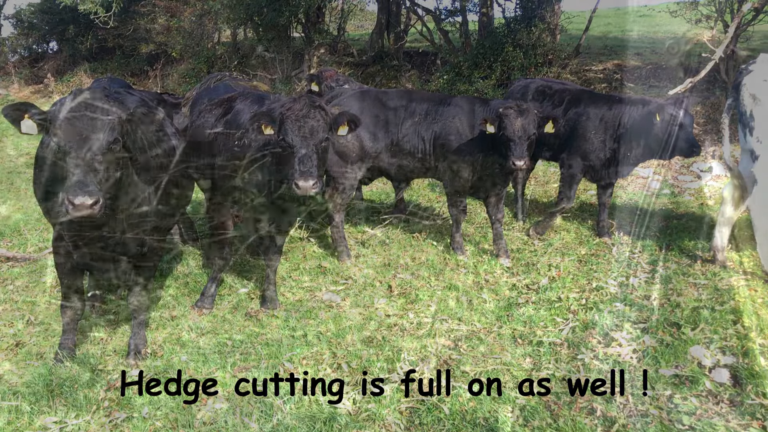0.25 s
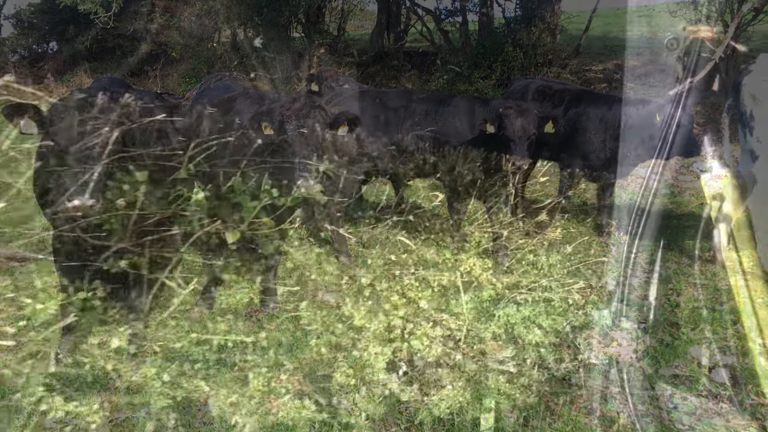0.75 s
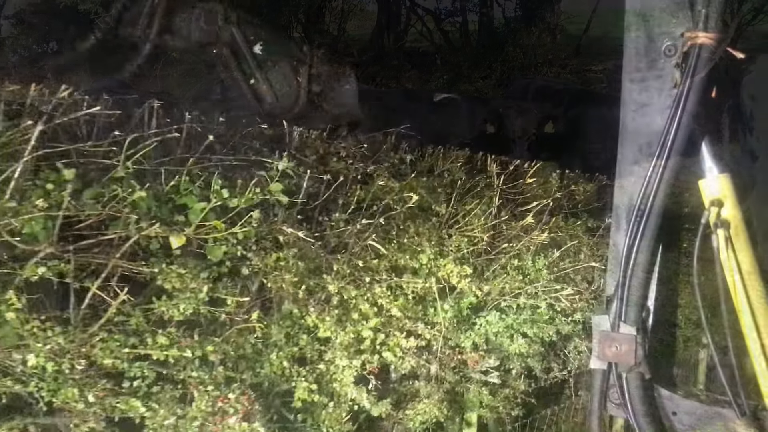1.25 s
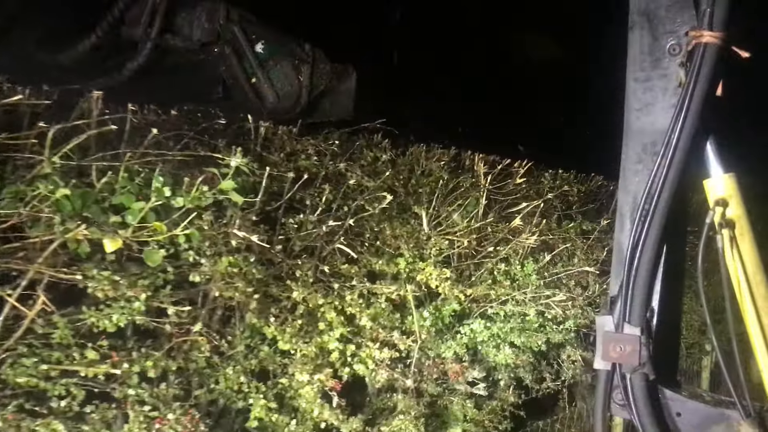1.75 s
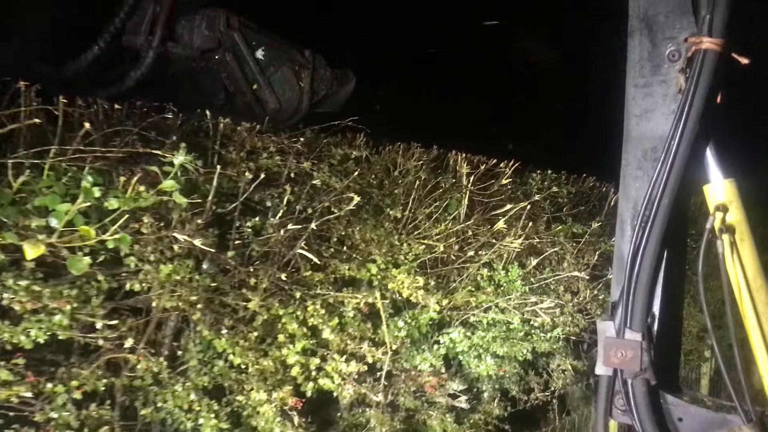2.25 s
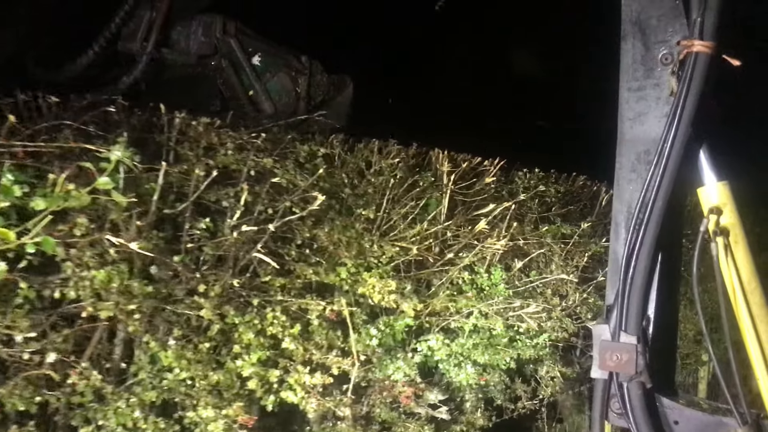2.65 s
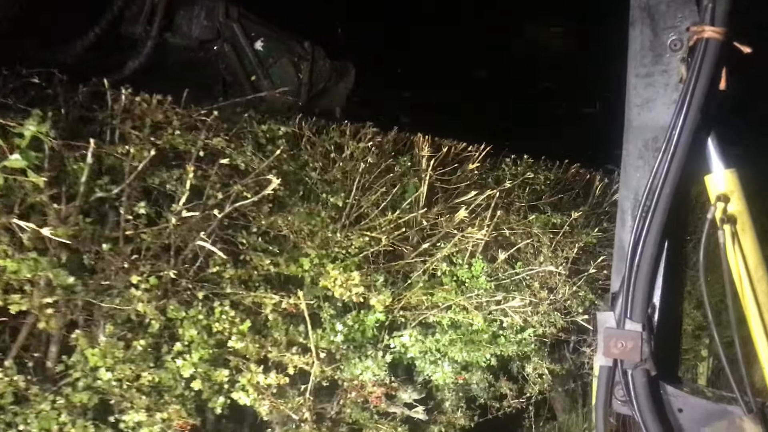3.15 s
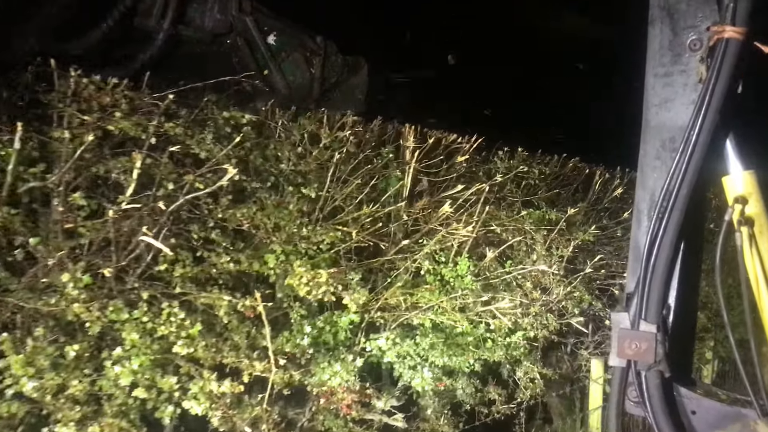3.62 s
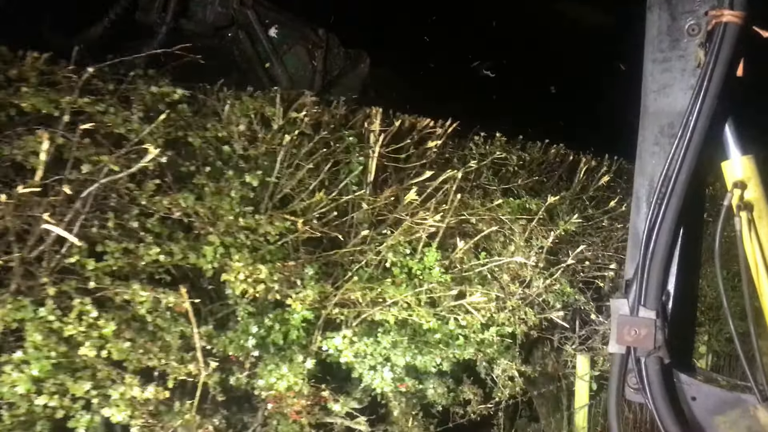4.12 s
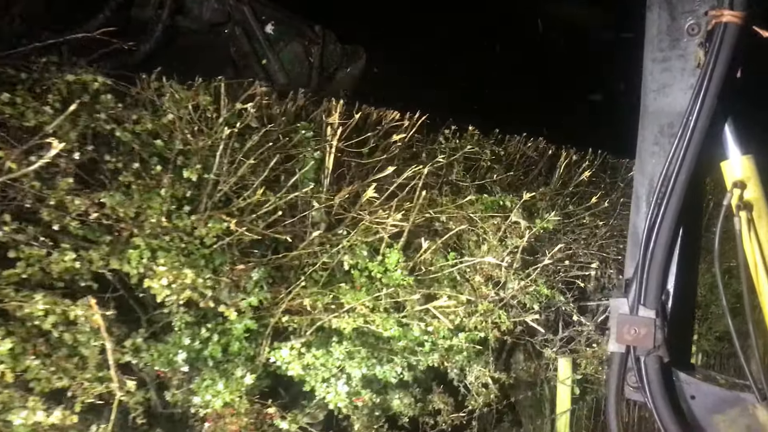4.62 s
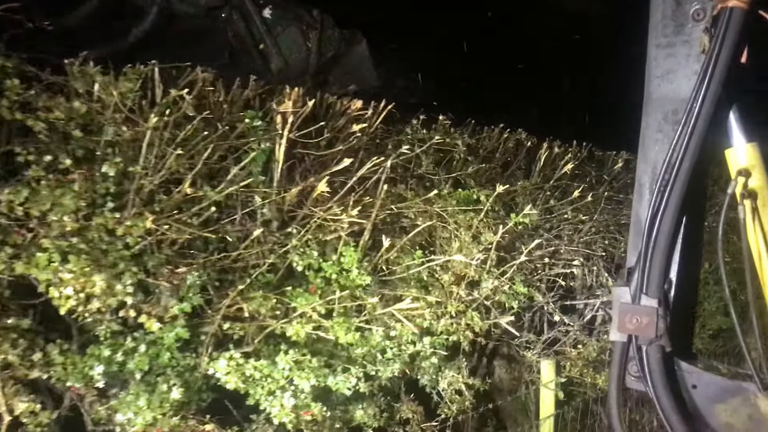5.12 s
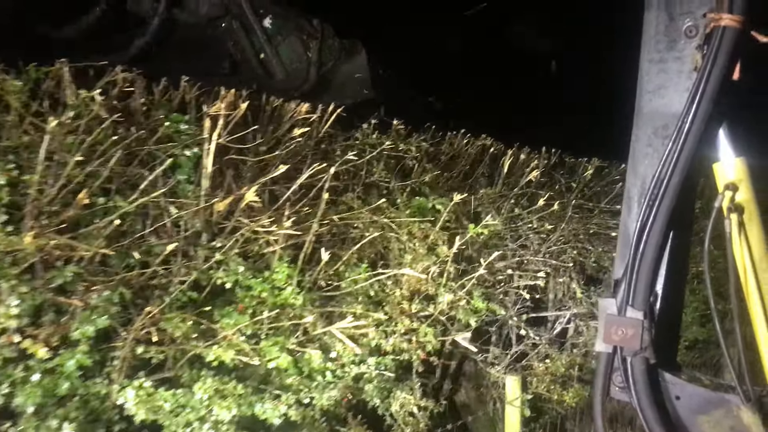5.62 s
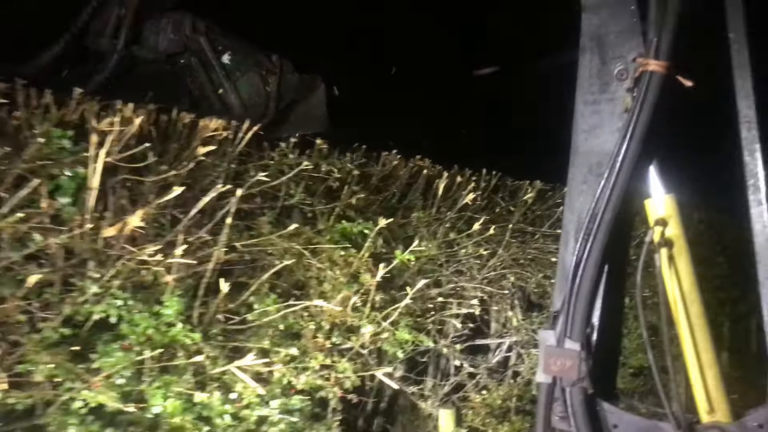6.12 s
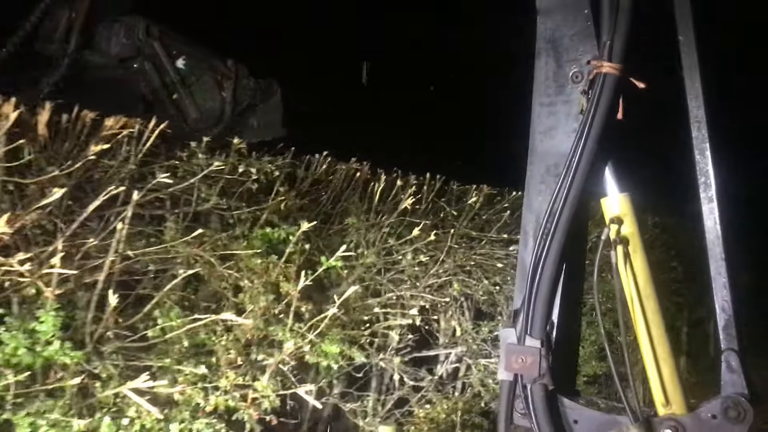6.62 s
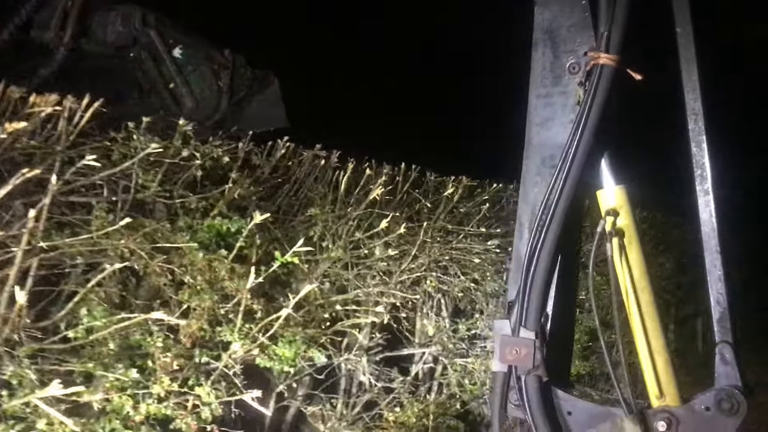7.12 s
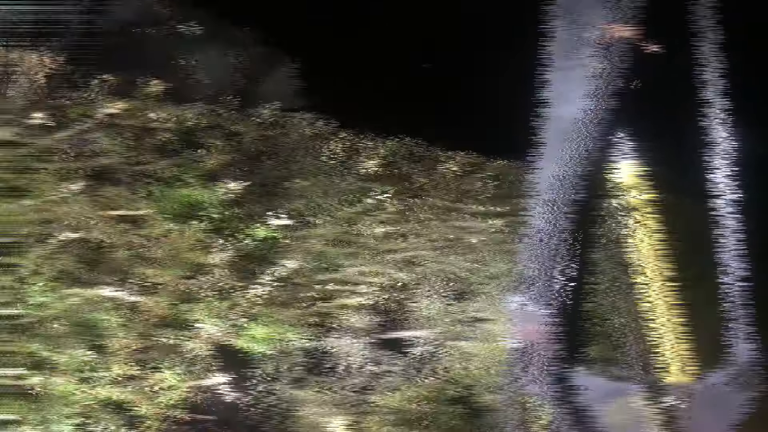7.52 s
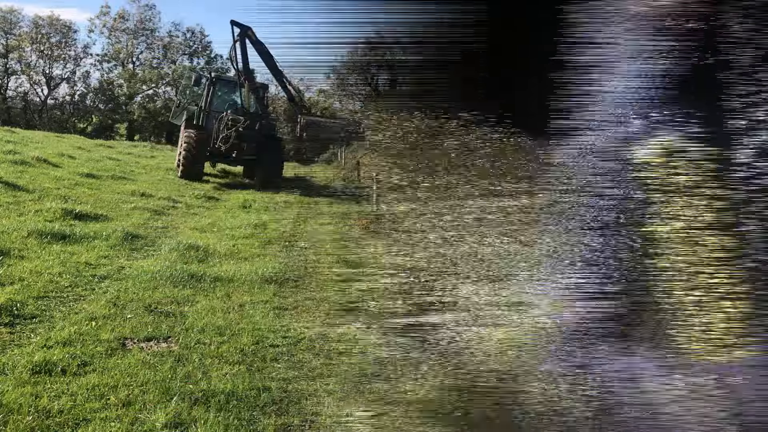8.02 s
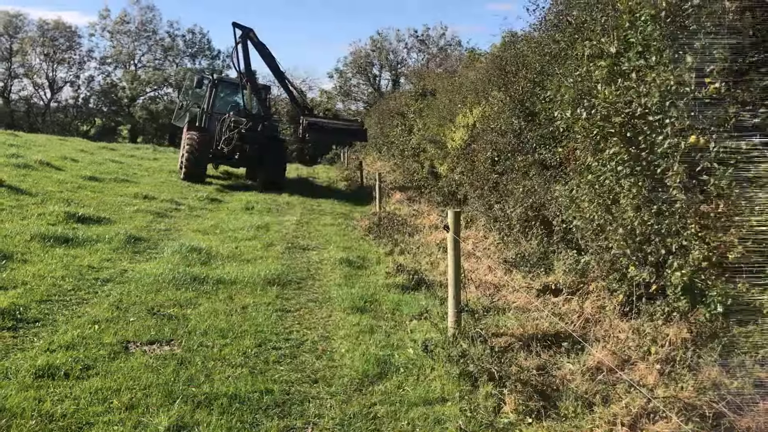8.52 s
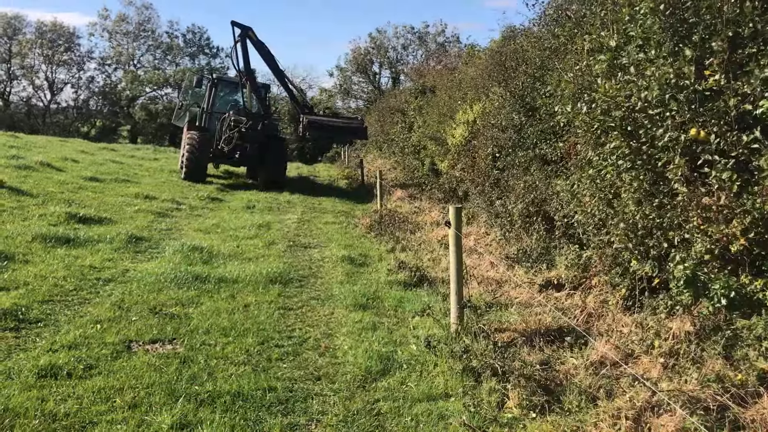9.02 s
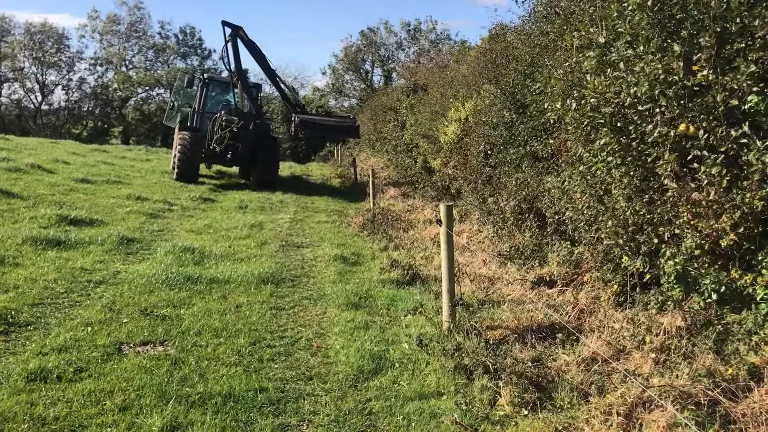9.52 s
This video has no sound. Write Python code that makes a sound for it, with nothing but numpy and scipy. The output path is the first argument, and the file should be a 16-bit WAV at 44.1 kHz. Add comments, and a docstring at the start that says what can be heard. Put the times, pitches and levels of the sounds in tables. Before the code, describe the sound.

A tractor trimming a hedge fades in, heard close beside the cab at a field edge. Its diesel throbs and whines and the cutter's rotor hums, while flails crunch through wood, crack twigs, snap thick stems and spray leaves and chips. The near machine then fades out with a faint thin squeal and a soft swish of leaves, leaving a much quieter tractor knocking far across the open field.

```python
"""A field edge, beside the cab of a tractor trimming a hedge with a flail head. The diesel throbs and
whines and the rotor hums; the flails chop through wood and throw a spray of chips, thick stems snap
and single twigs burst with a crack. This near sound fades in, then out with a thin squeal and a swish
of leaves, giving way to the knocking diesel of a tractor far across the field."""
import sys
import numpy as np
from scipy import signal
from scipy.fft import rfft, irfft, next_fast_len
from scipy.io import wavfile
from scipy.ndimage import uniform_filter1d, map_coordinates

SR = 44100
rng = np.random.default_rng(int(sys.argv[2]) if len(sys.argv) > 2 else 0)


def dump(signal):
    """Clip the signal to [-1, 1] and save it as 16-bit WAV at the path in sys.argv[1]."""
    limited = np.clip(np.atleast_2d(signal).T, -1, 1)
    pcm = np.round(limited * 32767).astype(np.int16)
    wavfile.write(sys.argv[1], SR, pcm)


N = 430416

# Table levels are relative: layer trims and the near fade ride on top of them.
# open air over the field: (frequency [Hz], level [dB])
AIR_SPECTRUM = [(20, -6), (300, 13), (1500, 8), (3000, -4), (5000, -8.5), (8000, -9), (11000, -13),
                (15000, -34)]
# fade-in of the far tractor and the air: (time [s], level [dB])
FAR_FADE = [(7.4, -85), (7.8, -64), (8.2, -48.5), (8.55, -46), (8.8, -44.5), (9.15, -43.5), (9.76, -43.5)]
# tone of one far exhaust beat: (frequency [Hz], level [dB])
FAR_EXHAUST_SPECTRUM = [(15, -24), (32, -1), (64, 2), (96, 1), (128, -5.5), (165, -5), (260, -23),
                        (450, -20), (560, -27.5), (1000, -34), (2500, -39), (8000, -75)]
# far engine clatter: (frequency [Hz], level [dB])
FAR_CLATTER_SPECTRUM = [(300, -40), (650, 5.5), (900, -13), (1100, 1), (1600, 0), (2400, -5.5),
                        (3100, -16.5), (5000, -25), (8000, -23), (15000, -60)]
# far rumble and echo: (frequency [Hz], level [dB])
FAR_RUMBLE_SPECTRUM = [(20, -25), (60, -8), (130, -3), (230, 3), (340, 1), (470, 1.5), (570, -12.5),
                       (1000, -12.5), (4000, -53)]
# ring of the far engine block: (frequency [Hz], width [Hz], gain [dB])
BLOCK_RESONANCES = [(1070, 90, 5), (1570, 220, 3.5), (2140, 150, 1), (3660, 240, 7), (4960, 450, 11)]
# hardest knocks of the far diesel: (time [s], level [dB])
HARD_KNOCKS = [(8.747, -37), (8.873, -41), (8.937, -44), (8.999, -43), (9.063, -44), (9.094, -39),
               (9.348, -41), (9.501, -43), (9.531, -42), (9.567, -45), (9.598, -45)]
# what each knock rings: (frequency [Hz], level [dB], t60 [s])
KNOCK_MODES = [(1080, -10, 0.022), (1290, -14, .012), (1560, -1, 0.028), (1750, -4, .014),
               (2220, -12, .016), (2570, -19, .016)]

# fader ride on the near tractor and its cutting: (time [s], level [dB])
NEAR_FADE = [(0.62, -37), (0.7, -26.5), (0.83, -20), (1.02, -15.5), (1.35, -9.5), (1.9, -4), (2.3, -3),
             (2.85, -.5), (4.3, 0.3), (5.85, 0.2), (6.25, -2), (6.75, -2.5), (7.5, -8), (8.0, -15),
             (8.3, -19.5), (8.7, -31)]
# four-cylinder diesel, sagging in thick growth: (time [s], firing rate [Hz])
FIRING_RATE = [(0.62, 42.8), (1.15, 42.6), (1.6, 42.85), (1.9, 42.1), (2.1, 42.3), (2.35, 41.95),
               (2.6, 43.2), (2.85, 43.0), (3.5, 42.2), (4.2, 42.25), (4.7, 41.9), (4.95, 42.2),
               (5.25, 41.8), (5.8, 42.0), (6.5, 42.95), (6.9, 42.6), (8.0, 42.85)]
# thickness of the growth in the flails: (time [s], load [0-1])
GROWTH_LOAD = [(2.4, 0), (2.9, 0.85), (5.4, 0.7), (6.0, 0.1)]
# exhaust throb: (time [s], level [dB])
EXHAUST_LEVEL = [(0.8, -37), (1.02, -29), (1.3, -28), (1.75, -37.5), (2.15, -30.5), (2.55, -25),
                 (2.95, -40), (3.25, -28), (3.6, -30.5), (4.2, -30.5), (4.7, -27.5), (5.45, -31),
                 (5.75, -28), (6.3, -27), (6.68, -37.5), (7.1, -27), (8.4, -31.5)]
# diesel tones, in quarter steps for four cylinders: (order [x firing rate], level [dB])
DIESEL_ORDERS = [(1.25, -18), (2, -5), (2.25, -17), (2.75, -18.5), (3, -4.5), (3.25, -10.5), (3.5, -16),
                 (4, -12.5), (4.25, -11), (4.5, -17), (4.75, -20.5), (5, -21), (6.75, -19), (10, -11.5),
                 (10.25, -20.5), (10.5, -15), (11, -12), (12, -14.5), (13, -15.5), (13.5, -28), (14, -18.5),
                 (15, -25), (17.25, -19.5), (17.5, -14.5), (24, -20), (27.75, -21), (28, -21.5),
                 (34.75, -24)]
# hum of the flail rotor: (order [x rotor speed], level [dB])
ROTOR_ORDERS = [(4, -6), (8, -11.5)]
# roar of the machine: (frequency [Hz], level [dB])
ROAR_SPECTRUM = [(20, -35), (35, 1), (65, 1), (100, -7.5), (160, -1.5), (240, -0.5), (360, -7), (620, -8),
                 (900, -9.5), (1400, -12), (1800, -17), (3200, -26), (5000, -31.5), (15000, -41)]
# pulsing of the roar: (order [x firing rate], depth [dB])
ROAR_PULSES = [(0.25, 0.6), (1, 0.5), (1.5, 0.6), (2, 1.0), (3, 0.9)]
# steel hood over the rotor: (frequency [Hz], width [Hz], gain [dB])
HOOD_RESONANCES = [(463, 24, 1), (1033, 48, 4.5), (1186, 185, 6.5), (1464, 60, 3), (2030, 150, 3.5),
                   (2238, 110, 7), (2930, 290, 6), (4120, 250, 4.5)]
# a loose panel singing in the roar: (frequency [Hz], width [Hz], gain [dB])
PANEL_RESONANCE = [(743.5, 18, 6)]
# ride on the low boom: (time [s], level [dB])
BOOM_LEVEL = [(1.0, -1.5), (3.0, -0.5), (4.8, 0), (5.8, 1.3), (6.8, 1.8), (8.0, 0.3)]

# thick stems snapping: (time [s], level [dB], lowest mode [Hz])
STEM_SNAPS = [(1.439, -29, 1140), (2.811, -31, 1390), (2.849, -19.5, 1090), (2.872, -23, 1110),
              (2.924, -24, 970), (2.95, -24, 1020), (3.467, -19, 1280), (3.492, -18, 1010),
              (3.847, -22, 1260), (3.866, -28, 1000), (4.785, -22, 1140), (4.838, -23, 1070),
              (4.869, -29, 1250), (4.922, -27, 1500), (5.872, -28.5, 1080), (6.472, -20.5, 980)]
# ring of a stem: (ratio [x lowest mode], level [dB], t60 [s])
STEM_MODES = [(1, 3.5, 0.011), (1.5, -5.5, 0.0063), (2.1, -3, 0.0067), (2.8, 2.5, 0.0036), (3.7, 1, 0.005)]
# the loudest twigs bursting: (time [s], level [dB], woody body gain [dB], body pitch [Hz])
TWIG_BURSTS = [(1.092, -24, -12, 3300), (1.1917, -24, -9, 2930), (1.286, -24.5, -5, 3210),
               (1.324, -22.5, -14, 3720), (1.429, -24.5, -13, 2870), (1.474, -32, -15, 5200),
               (1.646, -31, -7, 4300), (1.725, -29, -9, 8900), (1.85, -29.5, -20, 5000),
               (2.018, -28, -12, 5000), (2.384, -20, -10, 3040), (2.478, -24, -3, 3000),
               (2.714, -27.5, 3, 3170), (2.738, -33, 4, 2200), (2.9462, -22, 0, 4040),
               (3.24, -18, -7, 2980), (3.3794, -19, -15, 6300), (3.4461, -17, -18, 2790),
               (3.688, -23, -15, 3500), (3.772, -30, 3, 3130), (3.802, -33, 3, 3920),
               (3.8496, -23, 3, 2970), (3.893, -22, -5, 3500), (4.0956, -34, 6, 3090),
               (4.18, -23.5, -6, 3400), (4.423, -25, -11, 3100), (4.5744, -29, 1.5, 2250),
               (4.842, -29, 6, 2200), (5.053, -30, -10, 5500), (5.1053, -28, -2, 3900),
               (5.277, -28, -4.5, 4380), (5.362, -37, 4, 3600), (5.5099, -23.5, -20, 4090),
               (5.5817, -30, -17, 2870), (5.7544, -35, -17, 2500), (5.8641, -31.5, -11, 2940),
               (5.926, -28, -8, 2950), (5.984, -34, -8, 3400), (6.131, -30, -6, 2610),
               (6.225, -29.5, -6, 3630), (6.308, -24, -4.5, 3640), (6.344, -35, 2, 4600),
               (6.39, -30.5, 1, 4380), (6.464, -26, -12, 3900), (6.578, -29, -9, 5800),
               (6.653, -27, -15, 2680), (6.758, -33, -14, 3400), (6.832, -38, -13, 3800),
               (6.972, -32, -8, 2970), (7.039, -26, -8, 2540), (7.1082, -26, -11, 4170),
               (7.2144, -24, -15, 5950), (7.3721, -34, 5, 4330), (7.3944, -32, 0, 3640),
               (7.4305, -27.5, -0.5, 4360), (7.499, -32, -6, 2300), (7.5637, -30, -11, 6610),
               (7.6011, -24, -20, 2790), (7.672, -26.5, -5, 2780), (8.0441, -30, -11, 2500)]
# a twig's bright splinters: (frequency [Hz], level [dB])
SPLINTER_SPECTRUM = [(300, -22), (1500, 7), (3000, -3.5), (6000, 2), (9000, 1.5), (12000, -2),
                     (15500, -3.5)]
# a twig's woody body: (frequency [Hz], level [dB])
TWIG_BODY_SPECTRUM = [(200, -12), (900, 5), (2200, -7), (6500, -7.5), (14000, -20)]
# steady spray of leaves and chips: (time [s], level [dB])
SPRAY_LEVEL = [(0.8, -37.5), (1.1, -40), (1.7, -49), (2.03, -43.5), (2.34, -48.5), (2.4, -40.5),
               (2.75, -39), (3.1, -38.5), (3.65, -34.5), (4.1, -38.5), (5.03, -39), (5.2, -51.5),
               (5.55, -40), (5.74, -45.5), (5.83, -52.5), (6.45, -49), (6.95, -46.5), (7.3, -46),
               (7.74, -45), (7.88, -56)]
# branches drawn into the flails: (time [s], length [s], chop level [dB], spray level [dB])
BRANCH_FEEDS = [(2.392, 0.11, -40, -41), (2.794, 0.14, -28, -37.5), (2.864, 0.08, -38, -37),
                (3.012, 0.077, -34, -36.5), (3.246, 0.18, -33, -36.5), (3.413, 0.14, -32, -30.5),
                (3.763, 0.2, -41, -38), (4.41, 0.27, -33.5, -40), (4.661, 0.25, -32, -35.5),
                (4.813, 0.048, -33, -48), (5.5, 0.023, -51, -56), (5.61, 0.027, -46, -48),
                (5.86, 0.027, -39, -56), (7.159, 0.086, -40, -35), (7.305, 0.13, -47, -42)]
# flails in wood: (frequency [Hz], level [dB])
CHOP_SPECTRUM = [(40, -4), (90, 22.5), (200, 9.5), (400, 4.5), (800, 7), (1500, -1), (2100, 4.5),
                 (3300, -1.5), (5000, -1.5), (8000, -11), (15000, -23)]
# flying chips: (frequency [Hz], level [dB])
CHIP_SPECTRUM = [(300, -21), (1500, -1.5), (3000, 0.5), (6000, 1), (9000, -1), (12000, -3.5), (15500, -3)]
# treble notches of the microphone port: (frequency [Hz], width [Hz], gain [dB])
PORT_NOTCHES = [(4950, 280, -4.5), (7690, 680, -4), (10500, 400, -5)]

FAR_CRANK_HZ, FAR_BEAT_S = 31.88, 9.004  # far crank speed, and the time of one exhaust beat
ROTOR_LAG_HZ, TROUGH_S = 2.2, 2.99  # the rotor runs this far under the firing rate; a trough of the beat
TOP_HZ = 15790


def amp(db):
    """Decibels to gain."""
    return 10 ** (np.asarray(db) / 20)


def unit(x):
    """Scale to rms 1."""
    return x / np.sqrt(np.mean(x ** 2) + 1e-20)


def clock():
    """Time of each sample."""
    return np.arange(N) / SR


def curve(points):
    """An automation lane: (time, value) points drawn out to every sample."""
    return np.interp(clock(), *np.transpose(points))


def along(points, hz):
    """Read an EQ curve in dB on a log frequency axis."""
    frequencies, levels = np.transpose(points)
    return np.interp(np.log(hz + 1), np.log(frequencies + 1), levels)


def bumps(modes, hz):
    """Gain in dB of a set of resonances or notches."""
    return sum(db / (1 + (2 * (hz - centre) / width) ** 2) for centre, width, db in modes)


def wobble(rate):
    """A smooth random curve, rate knots a second."""
    return map_coordinates(rng.standard_normal(int(N * rate / SR) + 4), [clock() * rate], order=2)


def filtered(x, response):
    """Zero-phase EQ: response gives the gain at each frequency."""
    size = next_fast_len(N + SR // 4)
    return irfft(rfft(x, size) * response(np.fft.rfftfreq(size, 1 / SR)), size)[:N]


def coloured(x, spectrum, modes=()):
    """x through a spectrum and its resonances, at rms 1."""
    return unit(filtered(x, lambda hz: amp(along(spectrum, hz) + bumps(modes, hz))))


def impulse_response(spectrum, size=4096):
    """Minimum-phase pulse with a given spectrum."""
    cepstrum = irfft(np.log(amp(along(spectrum, np.fft.rfftfreq(size, 1 / SR)))))
    cepstrum[1:size // 2] *= 2
    cepstrum[size // 2 + 1:] = 0
    return irfft(np.exp(rfft(cepstrum)))


def ticks(rate, scatter_db):
    """Random impacts of uneven size, rate a second."""
    return (rng.random(N) < rate / SR) * amp(scatter_db * np.clip(rng.standard_normal(N), -2, 2))


def crackle(rate, hiss):
    """Dense tiny fractures over a fine hiss."""
    clicks = unit(ticks(rate, scatter_db=4) * rng.choice([-1, 1], N))
    return unit(clicks + hiss * rng.standard_normal(N))


def bursts(blows, t60):
    """Envelope of rms 1: every blow starts a burst that dies away."""
    t = np.arange(SR // 4) / SR
    power = signal.fftconvolve(blows ** 2, amp(-60 * t / t60) ** 2)[:N]
    return unit(np.sqrt(np.abs(power)))


def struck(modes, scale, t, t60):
    """A quick, dying run of small blows rings a set of modes, balanced a little differently each time."""
    blows = rng.standard_normal(len(t)) * (rng.random(len(t)) < 3000 / SR)
    ring = sum(amp(db + 2 * rng.standard_normal() - 60 * t / mode_t60)
               * np.sin(2 * np.pi * (scale * mode * t + rng.random())) for mode, db, mode_t60 in modes)
    attack = 1 - np.exp(-t / .002)
    return attack * amp(-60 * t / t60) * unit(signal.fftconvolve(blows, ring)[:len(t)])


def open_air():
    """A faint bed of hiss, tinted by the far engine's block and rising with it."""
    return amp(curve(FAR_FADE) - 15.5) * coloured(rng.standard_normal(N), AIR_SPECTRUM, BLOCK_RESONANCES)


def far_tractor():
    """One exhaust beat stands out in each crank turn, led by a clatter that rings the block."""
    turns = np.floor((clock() - FAR_BEAT_S) * FAR_CRANK_HZ)
    beats = np.diff(turns, prepend=turns[0]) * amp(0.71 * rng.standard_normal(N))
    t = np.arange(SR // 16) / SR
    scatter = rng.standard_normal(len(t)) * amp(-60 * t / 0.14)  # off the body, ground and hedge
    direct = unit(signal.fftconvolve(-beats, impulse_response(FAR_EXHAUST_SPECTRUM))[:N])
    echo = coloured(signal.fftconvolve(beats, scatter)[:N], FAR_RUMBLE_SPECTRUM)
    knocks = np.roll(beats, -SR // 180) * amp(0.6 * rng.standard_normal(N))
    knocking = .24 + uniform_filter1d(bursts(knocks, t60=.15), SR // 140)
    clatter = coloured(knocking * rng.standard_normal(N), FAR_CLATTER_SPECTRUM, BLOCK_RESONANCES)
    rumble = coloured(np.sqrt(knocking + 1e-6) * rng.standard_normal(N), FAR_RUMBLE_SPECTRUM)
    mix = amp(-5) * direct + amp(-6) * echo + amp(-8.5) * clatter + amp(-4) * rumble
    return amp(curve(FAR_FADE)) * mix


def far_knocks(smear_t60=0.063, cutoff_hz=4500):
    """Diesel knocks just ahead of each exhaust beat, smeared by ground and hedge, dulled by distance."""
    t = np.arange(SR // 16) / SR
    times = FAR_BEAT_S + np.arange(-40, 24) / FAR_CRANK_HZ - .005
    fade_db = np.interp(times, *np.transpose(FAR_FADE)) - FAR_FADE[-1][1]
    ordinary = zip(times, -55 + fade_db - rng.standard_normal(len(times)))
    out = np.zeros(N + len(t))
    for s, db in [*ordinary, *HARD_KNOCKS]:
        out[round(s * SR):][:len(t)] += amp(db - 3) * struck(KNOCK_MODES, 1, t, smear_t60)
    return filtered(out[:N], lambda hz: 1 / (1 + (hz / cutoff_hz) ** 4))


def rustle(centre_s=8.615, half_length_s=0.095):
    """A brief soft swish of leaves."""
    swell = np.exp(-((clock() - centre_s) / half_length_s) ** 4 / 2)
    return amp(-61) * swell * coloured(rng.standard_normal(N), CHIP_SPECTRUM)


def squeal(hz=10150):
    """A thin, faint squeal as the near machine fades."""
    swell = curve([(8.09, 0), (8.14, 1), (8.22, .8), (8.26, .25), (8.45, 0)])
    return amp(-75) * swell * np.sin(2 * np.pi * hz * clock() + 1.6 * wobble(160))


def cab_echoes(x, wet_db, count=40):
    """Boom arm, cab and bonnet throw back weak copies within 20 ms, which comb the treble."""
    lags = rng.integers(SR // 400, SR // 50, count)
    copies = sum(np.pad(x, (lag, 0))[:N] for lag in lags) / np.sqrt(count)
    treble = filtered(copies, lambda hz: hz ** 2 / (hz ** 2 + 1500 ** 2))
    return x + amp(wet_db) * treble


def debris_drift(x, depth_db):
    """Debris strikes ever different spots, so the mids and highs drift in colour."""
    hz, _, frames = signal.stft(x, SR, nperseg=512)
    patches = uniform_filter1d(rng.standard_normal(frames.shape), size=4, axis=0)
    patches = unit(uniform_filter1d(patches, size=9, axis=1))
    depth = depth_db * np.interp(hz, [600, 1400, 5000, 9000], [0, 1, 1, .5])
    return unit(signal.istft(frames * amp(depth[:, None] * patches), SR, nperseg=512)[1][:N])


def exhaust(firings, rotor_turns, shake_share=0.28):
    """The exhaust throbs once a firing; in thick growth it beats against the shake of the rotor."""
    shake = shake_share * curve(GROWTH_LOAD) * np.sin(2 * np.pi * rotor_turns)
    return amp(curve(EXHAUST_LEVEL)) * np.sqrt(2) * (np.sin(2 * np.pi * firings) - shake)


def shaft_tones(turns, orders, waver_db, slip):
    """Partials locked to a turning shaft; each wavers in level, and the high ones most in phase."""
    out = np.zeros(N)
    for order, db in orders:
        gain = amp(db + waver_db * wobble(9)) * np.sqrt(2)
        phase = 2 * np.pi * (order * turns + rng.random())
        out += gain * np.sin(phase + slip * np.sqrt(order) * wobble(14))
    return out


def machine(firings, rotor_turns, crossover_hz=240):
    """Diesel whine, rotor hum, and the pulsing roar of both in the hood."""
    diesel = shaft_tones(firings, DIESEL_ORDERS, waver_db=1.5, slip=.12)
    hum = shaft_tones(rotor_turns, ROTOR_ORDERS, waver_db=1.1, slip=.08)
    damping = amp(-1.5 * curve(GROWTH_LOAD))  # thick growth damps the hum
    throb = amp(sum(db * np.sin(2 * np.pi * order * firings) for order, db in ROAR_PULSES))
    roar = coloured(throb * rng.standard_normal(N), ROAR_SPECTRUM, [*HOOD_RESONANCES, *PANEL_RESONANCE])
    running = diesel + damping * hum + amp(0.65) * debris_drift(roar, depth_db=1.1)
    lows = filtered(running, lambda hz: 1 / (1 + (hz / crossover_hz) ** 8))
    pumping = amp(np.sin(2 * np.pi * firings))  # each firing pumps the low end by 1 dB
    boom = amp(curve(BOOM_LEVEL)) * unit(pumping * lows)
    return amp(-32) * (boom + unit(running - lows))


def stems(tear_t60=0.087):
    """Thick stems snap: fibres give way one after another and ring the wood, short and dry."""
    t = np.arange(SR // 8) / SR
    out = np.zeros(N)
    for s, db, hz in STEM_SNAPS:
        out[round(s * SR):][:len(t)] += amp(db - 3.5) * struck(STEM_MODES, hz, t, tear_t60)
    return out


def twigs(t60=0.13, crack_t60=0.01, crack_db=-4, body_q=2.1):
    """Each twig gives way with a sharp crack: bright splinters over a broad resonance of its own."""
    t = np.arange(SR // 3) / SR
    attack = 1 - np.exp(-t / .0025)
    envelope = attack * (amp(-60 * t / t60) + amp(crack_db - 60 * t / crack_t60))
    splinters = coloured(crackle(3000, hiss=0.97), SPLINTER_SPECTRUM)
    fibres = coloured(crackle(2000, hiss=2.2), TWIG_BODY_SPECTRUM)
    out = np.zeros(N)
    for s, db, body_db, hz in TWIG_BURSTS:
        span = slice(round(s * SR), round(s * SR) + len(t))
        body = unit(signal.lfilter(*signal.iirpeak(hz, body_q, SR), fibres[span]))
        out[span] += amp(db) * envelope * (amp(-6) * splinters[span] + amp(body_db - 4.5) * body)
    return out


def fractures(rate, hz, cycles, spread, scatter_db=3):
    """Tiny breaks, rate a second: each rings at its own pitch around hz, falling 30 dB over `cycles`."""
    starts = np.flatnonzero(rng.random(N) < rate / SR)
    pitch, size = np.clip(rng.standard_normal((2, N))[:, starts, None], -2, 2)
    age = np.arange(SR // 120)
    turns = np.minimum(hz * np.exp(spread * pitch), TOP_HZ) * age / SR
    sign = rng.choice([-1, 1], N)[starts, None]
    rings = sign * amp(scatter_db * size - 30 * turns / cycles) * np.sin(2 * np.pi * turns)
    return unit(np.bincount((starts[:, None] + age).ravel(), rings.ravel(), N)[:N])


def hedge_feed(attack_s=0.015, release_t60=0.59):
    """Chop and spray gains: steady growth, plus each branch as it is drawn in, held and cleared."""
    t = clock()
    spray_power = amp(curve(SPRAY_LEVEL)) ** 2
    chop_power = spray_power * amp(-1.5) ** 2  # thin wood chopped along with the leaves
    for s, length, chop_db, spray_db in BRANCH_FEEDS:
        attack = np.clip((t - s) / attack_s, 0, 1)
        release = amp(-60 * np.clip(t - s - length, 0, 1) / release_t60)
        chop_power += (amp(chop_db) * attack * release) ** 2
        spray_power += (amp(spray_db) * attack * release) ** 2
    return np.sqrt(chop_power), np.sqrt(spray_power)


def flails(rotor_turns, bite_depth=.75):
    """Flails bite in clusters once a turn: wood crunches, splinters tick, chips hit hood and leaves."""
    chop_gain, spray_gain = hedge_feed()
    swing = 1.5 * wobble(14)  # hinged flails bite early or late
    bite = 1 + bite_depth * np.cos(2 * np.pi * rotor_turns + swing)
    blows = ticks(520 * bite, scatter_db=3)
    chop = coloured(bursts(blows, t60=0.1) * crackle(3500, hiss=1.3), CHOP_SPECTRUM, HOOD_RESONANCES)
    chop = debris_drift(chop, depth_db=1.8)
    spray = coloured(bursts(blows, t60=0.16) * crackle(3000, hiss=1.4), CHIP_SPECTRUM)
    spray = debris_drift(spray, depth_db=2)
    crunch = amp(-7.5) * fractures(1300 * bite, hz=2285, cycles=7.9, spread=.45)
    splinters = amp(-13) * fractures(800 * bite, hz=7900, cycles=3.8, spread=.4)
    return chop_gain * (chop + crunch) + spray_gain * (amp(2.5) * spray + splinters)


def scene():
    """The near machine fades in, then crossfades to the far one; both channels carry the same mix."""
    firings = np.cumsum(curve(FIRING_RATE)) / SR
    rotor_turns = firings - ROTOR_LAG_HZ * (clock() - TROUGH_S)
    tractor = machine(firings, rotor_turns) + exhaust(firings, rotor_turns)
    cutting = flails(rotor_turns) + twigs() + stems()
    gate = curve([(.62, 0), (.625, 1), (8.5, 1), (8.7, 0)])
    near = gate * amp(curve(NEAR_FADE)) * cab_echoes(tractor + cutting, wet_db=-12) + squeal()
    field = far_tractor() + far_knocks() + open_air() + rustle()
    mono = near + field * (clock() > 7.4)
    return np.array([mono, mono])


def record(dry):
    """The microphone port notches the treble, and a steep high cut closes off the top."""
    def response(hz):
        high_cut = (1 - np.tanh((hz - TOP_HZ) / 70)) / 2
        return amp(bumps(PORT_NOTCHES, hz)) * high_cut
    return np.array([filtered(channel, response) for channel in dry])


dry = scene()
out = record(dry)
dump(out)
```